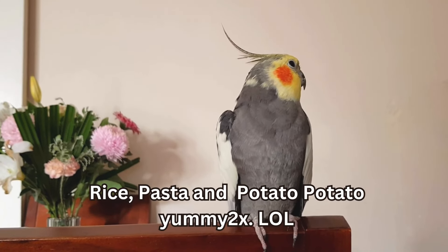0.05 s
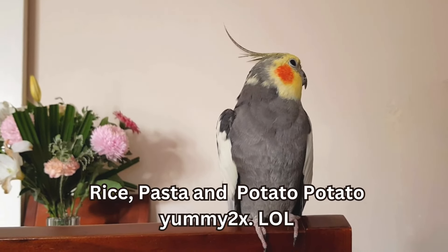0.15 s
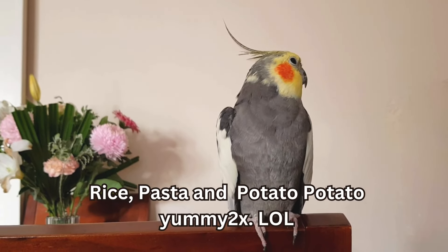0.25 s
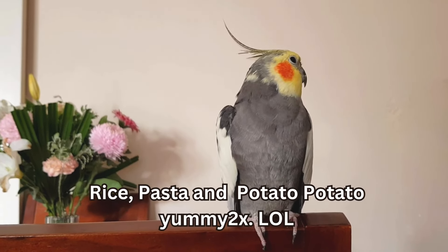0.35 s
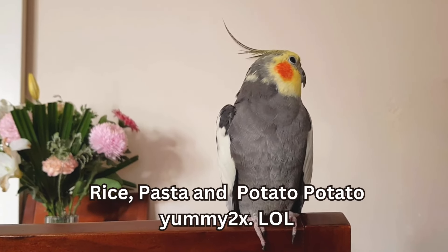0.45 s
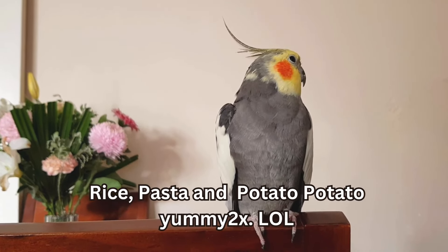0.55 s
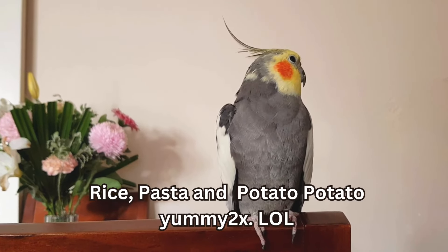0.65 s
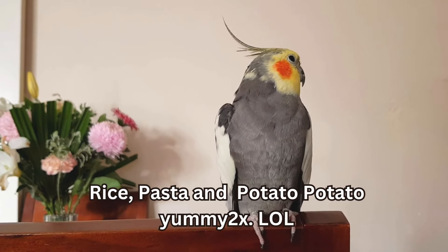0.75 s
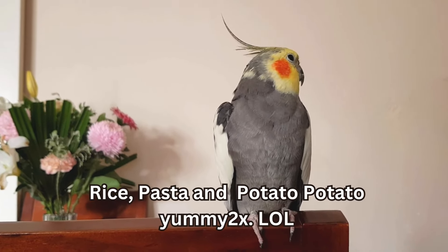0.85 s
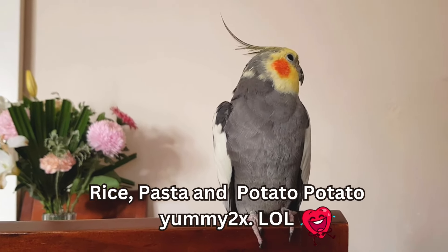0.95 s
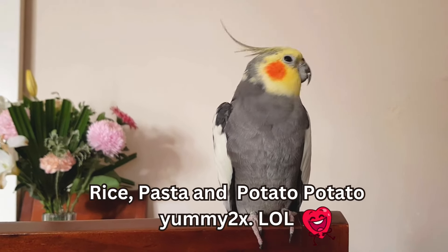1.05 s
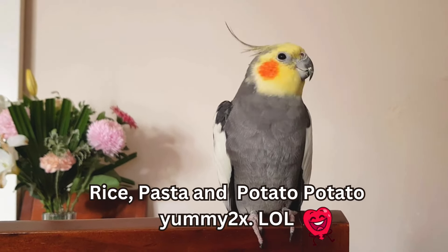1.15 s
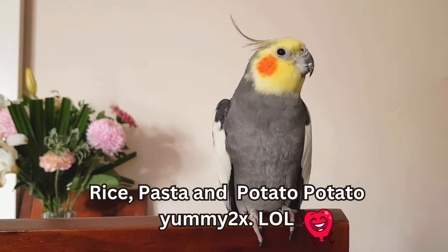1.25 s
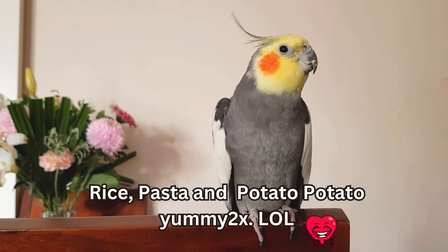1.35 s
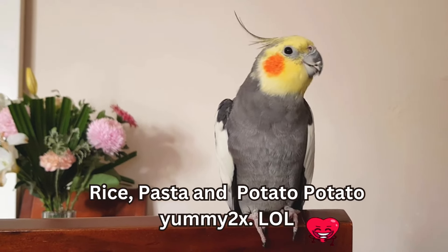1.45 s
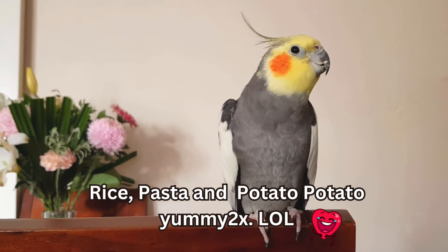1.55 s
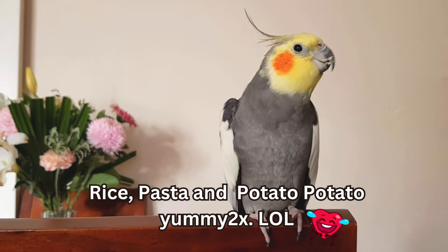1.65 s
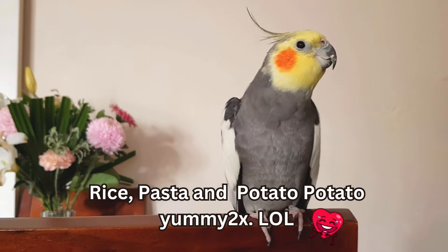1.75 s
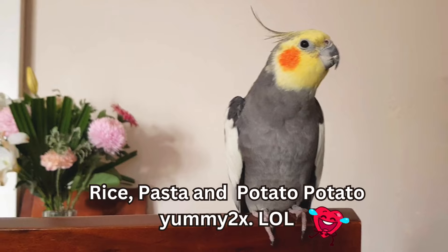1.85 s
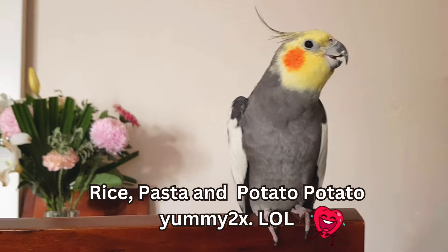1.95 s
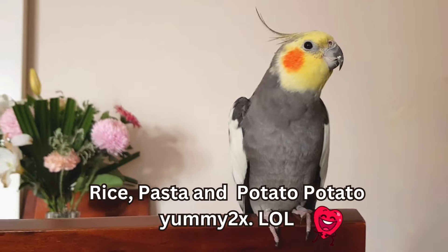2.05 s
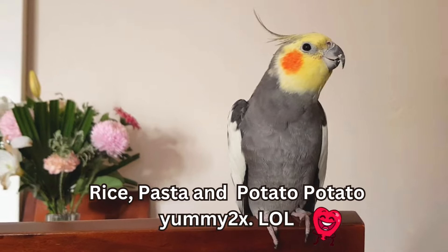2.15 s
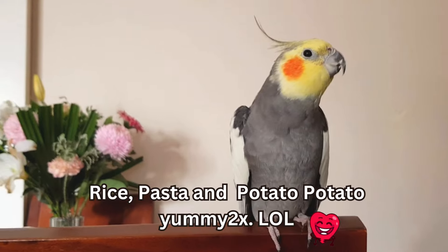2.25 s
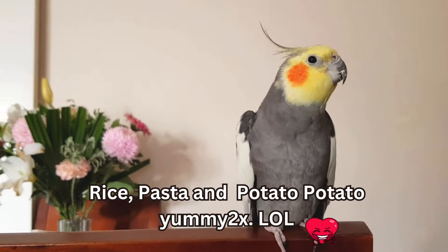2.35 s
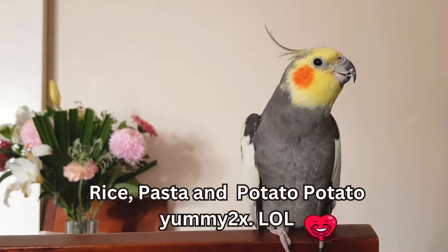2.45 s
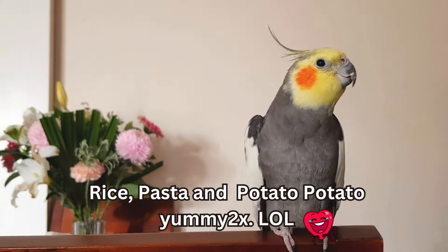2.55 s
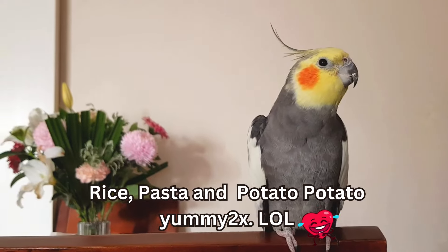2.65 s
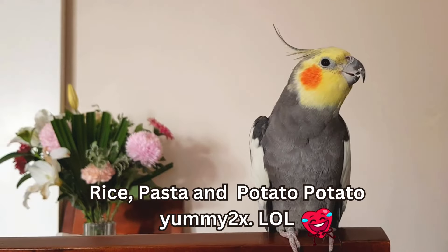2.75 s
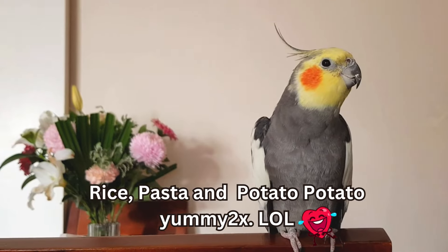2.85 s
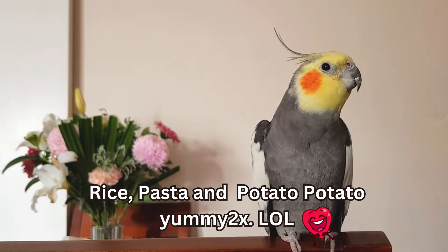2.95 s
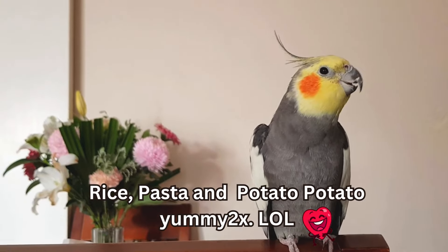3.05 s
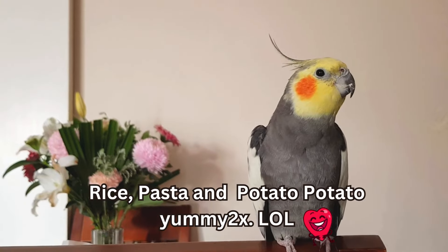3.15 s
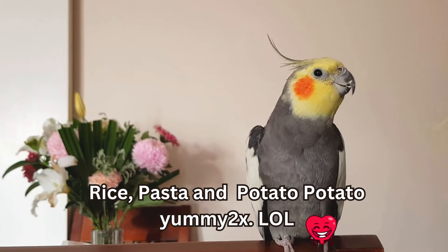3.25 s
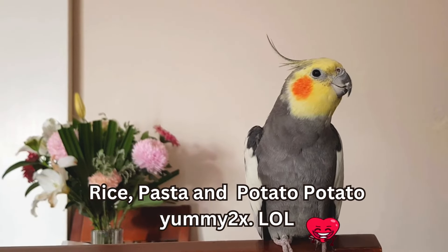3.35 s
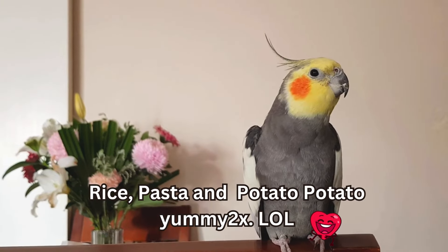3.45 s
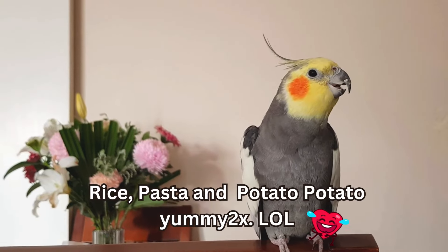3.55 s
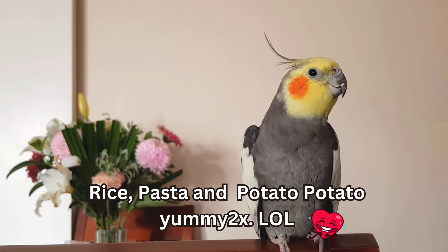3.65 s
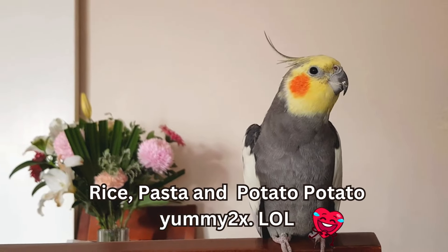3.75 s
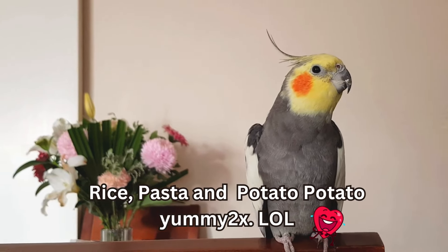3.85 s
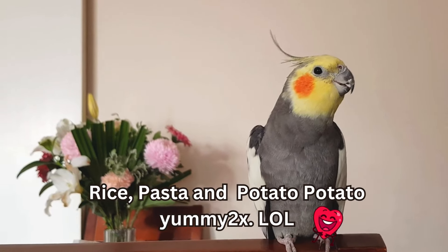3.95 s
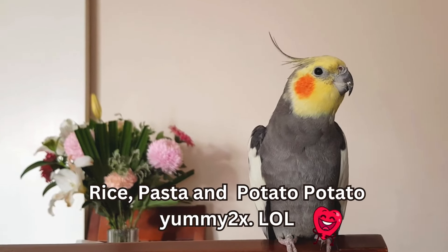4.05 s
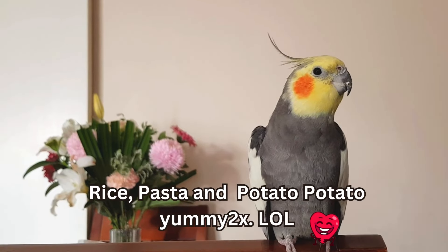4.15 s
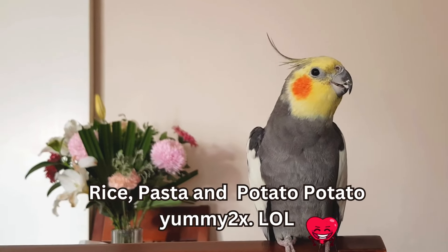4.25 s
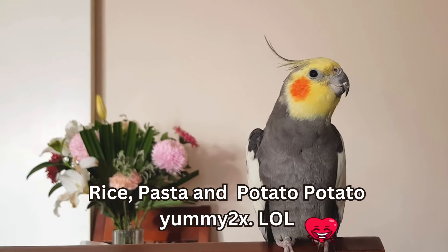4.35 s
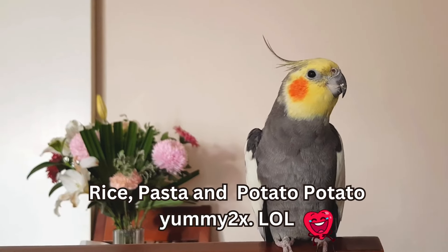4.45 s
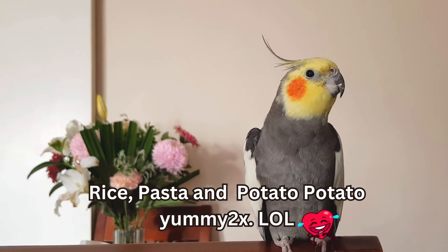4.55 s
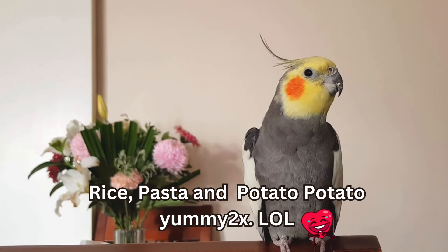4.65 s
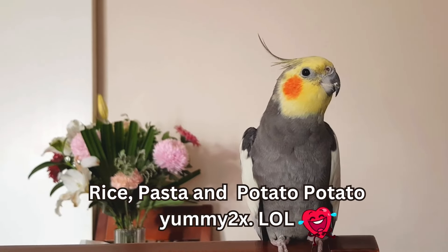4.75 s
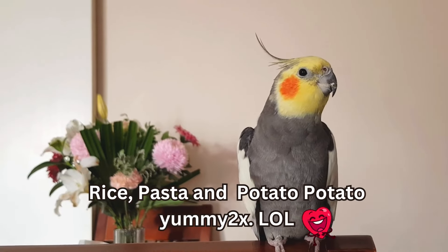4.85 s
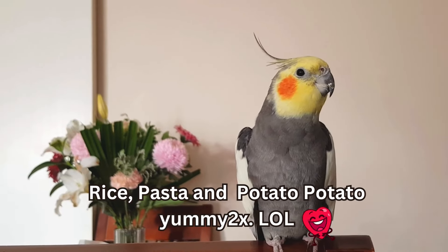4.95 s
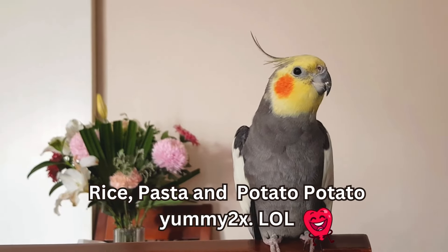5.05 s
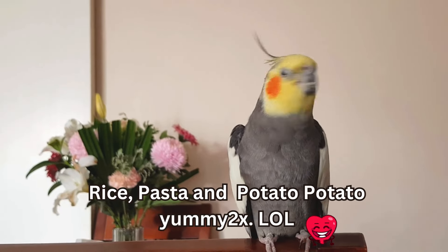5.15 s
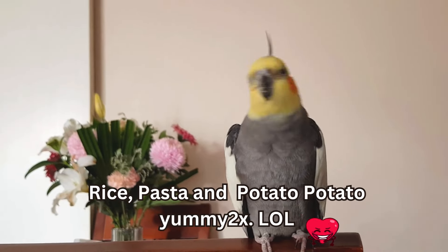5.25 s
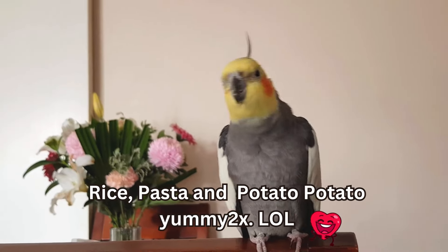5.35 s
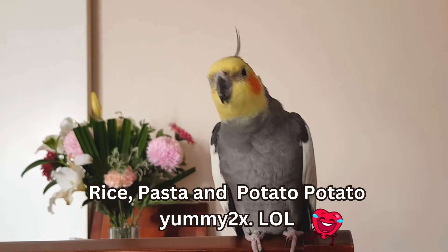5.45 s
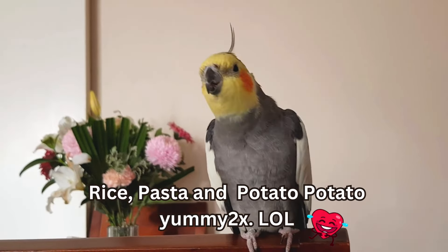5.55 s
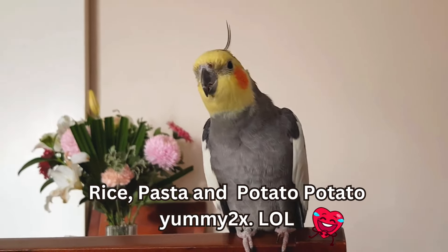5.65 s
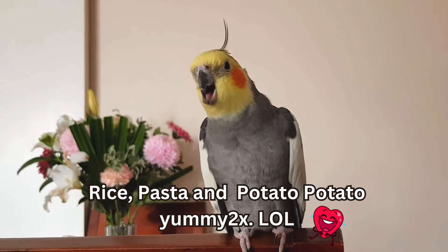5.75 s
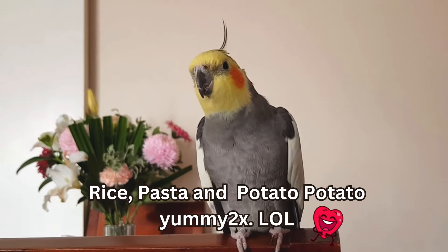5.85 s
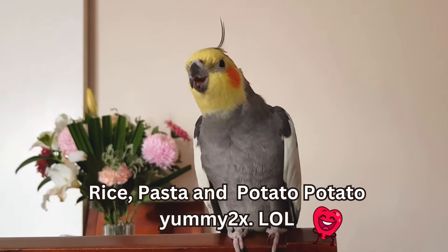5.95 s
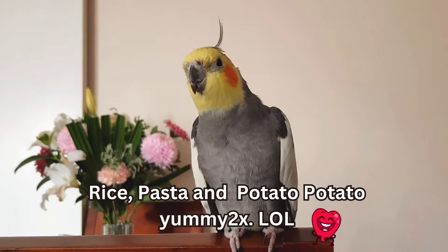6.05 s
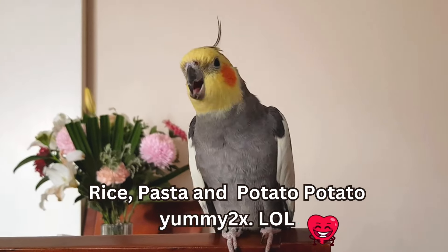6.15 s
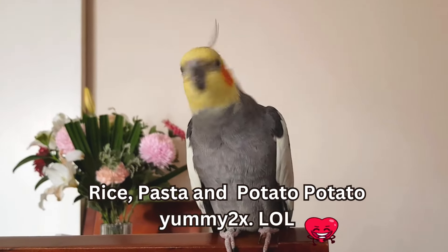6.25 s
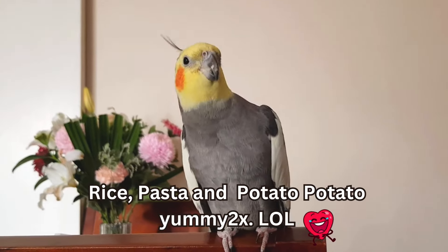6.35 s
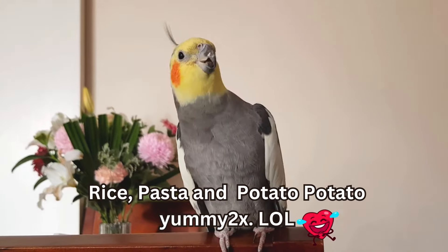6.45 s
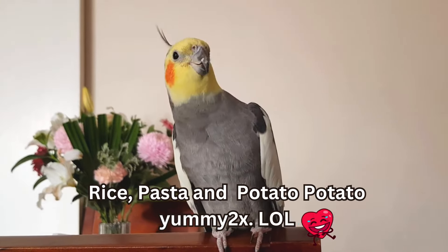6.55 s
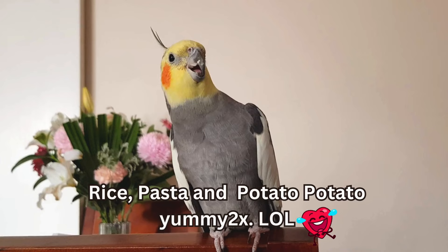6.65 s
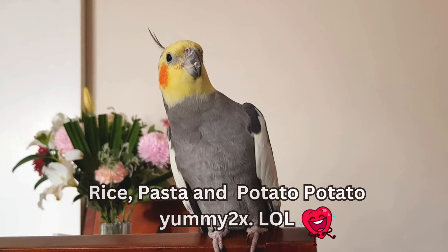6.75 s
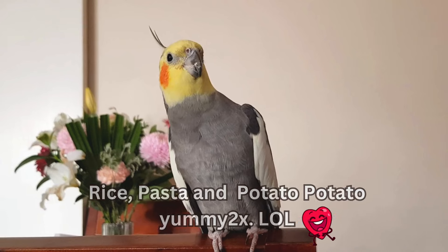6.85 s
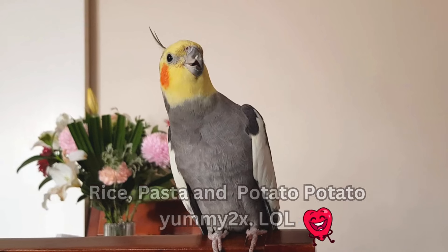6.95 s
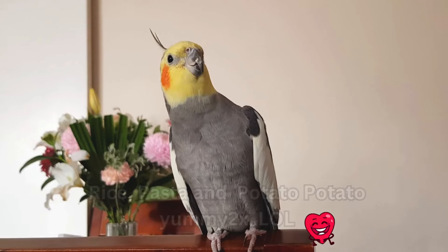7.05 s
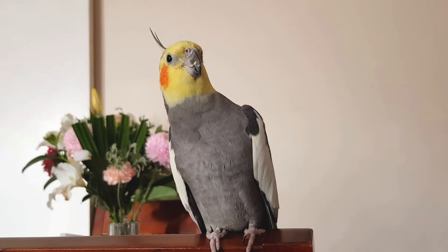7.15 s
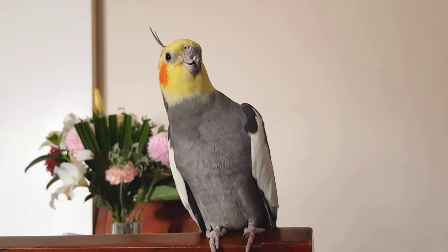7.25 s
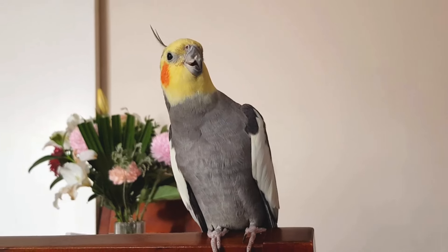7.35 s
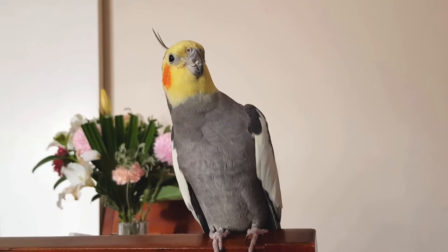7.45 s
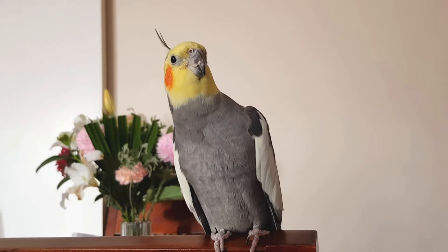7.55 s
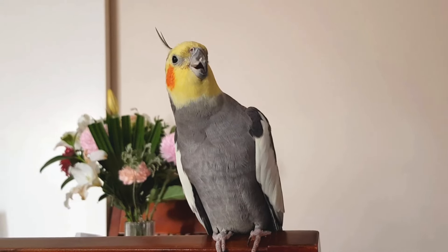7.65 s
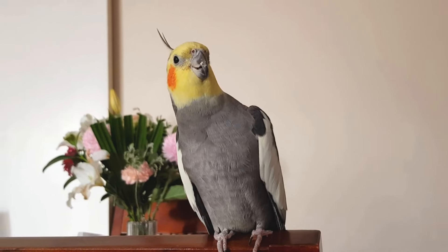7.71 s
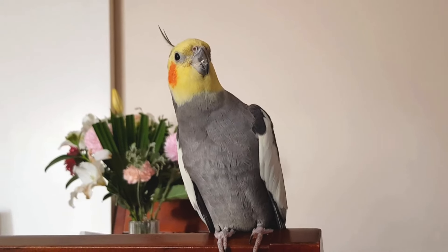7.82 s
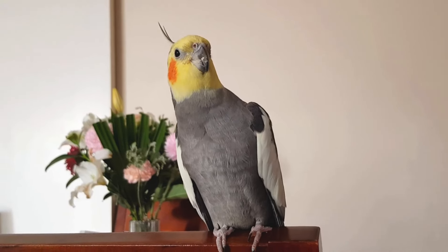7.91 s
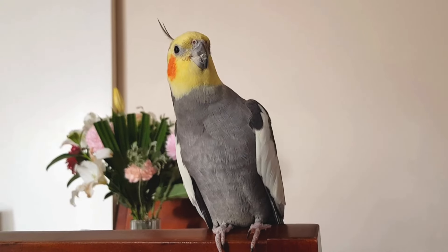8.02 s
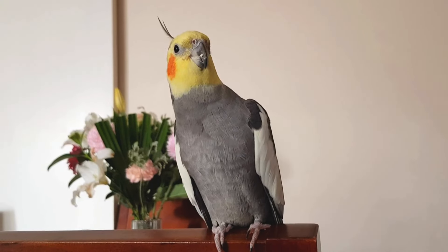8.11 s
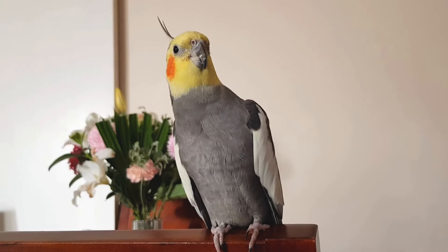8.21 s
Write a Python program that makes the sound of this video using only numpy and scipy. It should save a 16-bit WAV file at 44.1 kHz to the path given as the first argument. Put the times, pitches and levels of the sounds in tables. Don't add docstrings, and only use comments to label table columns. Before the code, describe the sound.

A cockatiel close to the microphone in a quiet, hard-walled room opens with small throaty clucks and a brief harsh screech, then gives loud, clear, short whistles scooping upward at a steady pace. After a pause come softer whistles alternating with three rapid, raspy squawks. Sparrows chirp faintly outside, a vehicle slowly accelerates in the street, and low hum and hiss lie underneath.

```python
import sys
import numpy as np
from scipy import signal
from scipy.fft import rfft, irfft, next_fast_len
from scipy.io import wavfile
from scipy.ndimage import uniform_filter1d

SR = 44100
rng = np.random.default_rng(int(sys.argv[2]) if len(sys.argv) > 2 else 0)


def ratio_of_db(decibels):
    return 10 ** (np.asarray(decibels, float) / 20)


def transcribe(u):
    v = np.clip(np.atleast_2d(u).T, -1, 1)
    q = np.round(v * 32767).astype(np.int16)
    wavfile.write(sys.argv[1], SR, q)


N = 365148


def shaped(x, points):
    size = next_fast_len(x.shape[-1])
    hz, db = np.transpose(points)
    f = np.maximum(np.fft.rfftfreq(size, 1 / SR), 1)
    gain = ratio_of_db(np.interp(np.log(f), np.log(np.maximum(hz, 1)), db))
    return irfft(rfft(x, size) * gain, size)[..., :x.shape[-1]]


def unit(x):
    return x / np.sqrt(np.mean(x ** 2))


def walk(rate, size):
    k = max(int(SR / rate), 1)
    chance = rng.standard_normal(max(size, 8192))
    once = uniform_filter1d(chance, k, mode="wrap")
    return unit(uniform_filter1d(once, k, mode="wrap"))[:size]


def later(x, samples):
    size = next_fast_len(len(x) + 64)
    phase = np.exp(-2j * np.pi * np.fft.rfftfreq(size) * samples)
    return irfft(rfft(x, size) * phase, size)[:len(x)]


def stack(turns, orders):
    return sum(np.sqrt(2) * ratio_of_db(db) * np.sin(2 * np.pi * k * turns + k * k) for k, db in orders)


# f/Hz, density level/dB
HUSH = [(120, -45.5), (200, -19), (692, -3.5), (1090, -1), (1220, -3), (1460, -1.5), (2620, -19),
        (3920, -20), (4370, -25.5), (5750, -23), (8440, -31), (13000, -17.5), (15700, -18)]
# f/Hz, density level/dB
RUMBLE = [(12, -36.5), (20, -8), (92, -1.5), (177, -11), (261, -13), (336, -30.5), (400, -30.5), (520, -57),
          (880, -120)]
HUSH_DB, RUMBLE_DB = -66.5, -71
THUD_S, THUD_HZ, THUD_DB = 0.575, 160, -60
CALM_S, CALM_LENGTH_S, CALM_DB = 7.6, .2, -7.5


def hush():
    t = np.arange(N) / SR
    both, left, right = rng.standard_normal((3, N))
    noise = .75 * np.array([both, later(both, 14.0)]) + .65 * np.array([left, right])
    hiss = unit(shaped(noise, HUSH)) * ratio_of_db(HUSH_DB)
    hum = ratio_of_db(0.5 + 1.4 * walk(6.3, N)) * np.sin(2 * np.pi * 100 * t)
    rumble = (unit(shaped(noise, RUMBLE)) + hum) * ratio_of_db(RUMBLE_DB + 2.1 * walk(2.1, N))
    thud = unit(shaped(both, [(THUD_HZ / 3, -30), (THUD_HZ, 0), (2.0 * THUD_HZ, -24), (900, -60)]))
    thud = thud * ratio_of_db(THUD_DB) * np.exp(-((t - THUD_S) / 0.077) ** 2)
    calm = ratio_of_db(CALM_DB * np.clip((t - CALM_S) / CALM_LENGTH_S + .5, 0, 1))
    return calm * (hiss + rumble + thud) * ratio_of_db(np.array([[-2.4], [2.4]]))


# f/Hz, T60/s
ROOM_T60 = [(500, 0.76), (2500, 0.39), (3800, 0.37), (5000, .46), (10000, 0.39), (15000, 0.35)]
# t/s, left level/dB, right level/dB
ECHOES = [
    (.004, -7.5, -39),
    (.009, -48.5, -8.5),
    (0.018, -16, -10),
]
ROOM_DB, ROOM_ALIKE = -9, 0.13


def room(x):
    t = np.arange(int(.9 * SR)) / SR
    both, left, right = rng.standard_normal((3, len(t)))
    alike = np.clip(ROOM_ALIKE, 0, 1)
    raw = np.sqrt(alike) * both + np.sqrt(1 - alike) * np.array([left, right])
    hz, t60 = np.transpose(ROOM_T60)
    tail = 0
    for k in range(len(hz)):
        band = [(f, 0 if j == k else -40) for j, f in enumerate(hz)]
        tail = tail + shaped(raw, band) * np.exp(-np.log(1000) * t / t60[k])
    tail = tail * np.clip((t - .005) / 0.038, 0, 1)
    tail = ratio_of_db(ROOM_DB) * tail / np.sqrt(np.sum(tail ** 2) / 2)
    for s, left_db, right_db in ECHOES:
        tail[:, int(s * SR)] += ratio_of_db(np.array([left_db, right_db]))
    return signal.fftconvolve(x[None], tail, axes=1)[:, :N]


# t/s, length/s, start f/Hz, end f/Hz, level/dB
SPARROWS = [(0.37, 0.048, 6100, 7260, -70), (0.596, 0.059, 5440, 6920, -64),
            (0.607, 0.078, 3050, 3820, -65.5), (0.683, 0.039, 3150, 3450, -60),
            (0.842, .07, 5450, 7060, -61), (0.873, 0.1, 3200, 4020, -61), (0.978, 0.12, 3160, 3470, -63),
            (1.087, 0.055, 5500, 7040, -61.5), (1.096, 0.11, 3090, 3300, -65),
            (1.2, 0.074, 6200, 6700, -67), (1.212, 0.11, 3160, 3990, -62),
            (3.411, 0.058, 3360, 3560, -64.5), (3.62, 0.16, 4500, 4450, -58), (1.82, .12, 5900, 6500, -66),
            (1.84, .1, 3000, 3700, -64), (2.36, .08, 5500, 6300, -70), (.78, .07, 4300, 4800, -68),
            (.99, .06, 6300, 6900, -69), (3.71, 0.14, 3420, 3500, -66), (4.82, .06, 4100, 4300, -77.5),
            (5.12, 0.12, 3690, 3900, -74), (5.2, 0.13, 2520, 2700, -69.5), (5.25, 0.086, 5300, 5400, -76)]
# f/Hz, level/dB
CHATTER = [(2500, -30), (3300, -2.5), (3900, -7.5), (4600, -4), (5600, -9.5), (6500, -10), (7600, -26.5)]
# start t/s, end t/s, level/dB
BOUTS = [
    (-.5, 1.45, -70),
    (1.5, 4.3, -75),
    (5.3, 7.4, -79),
]
BOUT_EDGE_S = .25


def sparrows():
    chirps = np.zeros(N)
    for s, length, hz0, hz1, db in SPARROWS:
        u = np.linspace(0, 1, int(length * SR))
        hz = (hz0 + (hz1 - hz0) * u ** 0.92) * (1 + 0.011 * walk(220, len(u)))
        sweep = np.sin(2 * np.pi * np.cumsum(hz) / SR)
        chirps[int(s * SR):int(s * SR) + len(u)] += ratio_of_db(db) * np.sin(np.pi * u) * sweep
    t = np.arange(N) / SR
    bouts = sum(ratio_of_db(db) * np.clip(np.minimum(t - s0, s1 - t) / BOUT_EDGE_S + .5, 0, 1) for s0, s1, db in BOUTS)
    level = bouts * ratio_of_db(4.5 * walk(9, N))
    flock = level * unit(shaped(rng.standard_normal((2, N)), CHATTER))
    return (chirps + flock) * np.array([[.6], [1]]) + room(chirps)


def columns(note, edge_s):
    s, *rest = np.transpose(note)
    t = np.arange(s[0], s[-1], 1 / SR)
    gate = np.clip(np.minimum(t - s[0], s[-1] - t) / edge_s, 0, 1)
    smooth = [uniform_filter1d(np.interp(t, s, c), int(0.00067 * SR), mode="nearest") for c in rest]
    return int(s[0] * SR), smooth, gate


def rough_notes(notes, orders, rasp, rasp_db):
    out = np.zeros(N)
    for note in notes:
        i, (hz, db, rough, *shares), gate = columns(note, 0.00033)
        turns = np.cumsum(hz * (1 + .08 * rough * walk(330, len(hz)))) / SR
        uneven = 1 + sum(share * np.sin(2 * np.pi * turns / (k + 2)) for k, share in enumerate(shares))
        size = 1 + np.clip(rough, 0, 1) * np.tanh(walk(400, len(hz)))
        sound = uneven * stack(turns, orders) + rough * ratio_of_db(rasp_db) * rasp[i:i + len(hz)]
        out[i:i + len(hz)] += gate * ratio_of_db(db) * size * sound
    return out


# t/s, f/Hz, level/dB
SCREECHES = [
    [(.003, 3950, -41), (.015, 3350, -41), (.03, 3050, -44)],
    [(1.472, 2300, -47), (1.492, 3100, -35), (1.515, 3280, -42), (1.545, 3790, -37.5), (1.567, 3350, -33.5),
     (1.587, 3000, -42.5), (1.605, 2700, -54)],
]
# multiple, level/dB
SCREECH_ORDERS = [(1, 5), (2, -33), (3, -20.5), (4, -28)]
SCREECH_ROUGH, SCREECH_HALF, SCREECH_THIRD = .45, .8, .25


def screech(curve):
    return [(s, hz, db, SCREECH_ROUGH, np.interp(hz, (2300, 3200), (SCREECH_HALF, .05)), SCREECH_THIRD)
            for s, hz, db in curve]


def screeches(rasp):
    return rough_notes([screech(curve) for curve in SCREECHES], SCREECH_ORDERS, rasp, rasp_db=4)


CRACK_AT, CRACK_WIDTH = .6, .1


def cluck(row, throat):
    s, length, hz0, hz1, db = row
    rough0, rough1, half0, half1, fall_db = throat
    u = np.linspace(0, 1, num=20)
    late = 1 / (1 + np.exp((CRACK_AT - u) / CRACK_WIDTH))
    hz = hz0 + (hz1 - hz0) * np.sin(np.pi * u / 2) ** 2
    rough = rough0 + (rough1 - rough0) * late
    half = half0 + (half1 - half0) * late
    return np.transpose([s + length * u, hz, db - fall_db * u ** 2, rough, half])


# t/s, length/s, start f/Hz, end f/Hz, level/dB
CRACKED = [(.3, .045, 1400, 1850, -42), (1.315, .063, 1350, 1330, -41.5)]
PLAIN_CLUCKS = [(.122, .03, 1440, 1350, -42)]
DOUBLED = [(.24, .03, 1420, 1290, -42)]
HOARSE = [(1.258, .01, 1420, 1310, -58), (5.335, .03, 2000, 1400, -61.5)]
# roughness 0-1 at start, at end, half-pitch share 0-1 at start, at end, final fall/dB
CRACK = (.05, .8, .04, .9, 7)
PLAIN = (.3, .3, .04, .04, -4)
DOUBLE = (.05, .05, .35, .35, 5)
HUSK = (.4, .4, .05, .05, 5)
# multiple, level/dB
CLUCK_ORDERS = [(1, 6), (2, -5.5), (3, -33), (4, -51.5)]


def clucks(rasp):
    throats = [(CRACKED, CRACK), (PLAIN_CLUCKS, PLAIN), (DOUBLED, DOUBLE), (HOARSE, HUSK)]
    notes = [cluck(row, throat) for rows, throat in throats for row in rows]
    return rough_notes(notes, CLUCK_ORDERS, rasp, rasp_db=-6)


ATTACK_S, ATTACK_DB, RELEASE_S = .005, 11, .017
BREATH_DB, BREATH_FADE_DB, BREATH_FOLLOWS = -22, 17, .4


def whistle(row, kind):
    s, length, hz0, hz1, db = row
    wait, rise, creep_hz, sag_hz, swell_wait, swell, swell_db, release_db, over_db = kind
    t = np.linspace(0, length, num=30)
    hz = hz1 - (hz1 - hz0) * np.exp(-np.maximum(t - wait, 0) / rise)
    hz = hz + creep_hz * t - sag_hz * (t / length) ** 4
    level_db = db - swell_db * np.exp(-np.maximum(t - swell_wait, 0) / swell)
    level_db = level_db - ATTACK_DB * np.exp(-t / ATTACK_S)
    level_db = level_db - release_db * np.clip(1 - (length - t) / RELEASE_S, 0, 1)
    air_db = db + BREATH_DB + BREATH_FOLLOWS * (level_db - db) - BREATH_FADE_DB * t / length
    return np.transpose([s + t, hz, level_db, over_db + 0 * t, air_db])


# t/s, length/s, start f/Hz, top f/Hz, level/dB
SCOOPS = [(1.664, .081, 1970, 2735, -14), (1.915, .09, 2120, 2785, -13.5), (2.716, .074, 2110, 2580, -16),
          (3.881, .085, 2020, 2845, -13.5)]
FLICKS = [(2.997, .083, 2100, 2780, -14), (3.268, .08, 2080, 2770, -12.5), (3.53, .087, 2110, 2805, -12.5),
          (6.39, .078, 2300, 2765, -21.5), (6.93, .084, 2400, 2765, -22)]
SLIDES = [(2.165, .097, 2010, 2370, -12.5), (2.451, .097, 1970, 2345, -12)]
ARCHES = [(5.53, .072, 2310, 2635, -25.5), (5.929, .077, 2200, 2870, -23.5)]
CLIMBS = [(4.247, .079, 2330, 2730, -12), (7.266, .094, 2440, 2715, -21.5), (7.583, .089, 2290, 2740, -20)]
# wait/s, pitch rise/s, creep/(Hz/s), final sag/Hz, swell wait/s, swell/s, swell/dB,
# release/dB, overtone level/dB
SCOOP = (.016, .013, 300, 10, .014, .015, 21, 10, -32)
FLICK = (.012, .013, 500, 10, .014, .015, 23, 10, -33)
SLIDE = (.03, .012, 1500, 60, .006, .045, 28, 6, -30)
ARCH = (.005, .014, 100, 320, .004, .013, 14, 3, -25)
CLIMB = (.002, .016, 3300, 10, .002, .02, 28, 9, -29)
# multiple, level/dB
WHISTLE_ORDERS = [(1, 1), (2, -2.5), (3, -4), (4, 3.5), (5, 9), (6, 3), (7, -7)]
# t/s, half length/s, rate/Hz, depth as a share of f
WARBLES = [
    (2.479, .015, 92, -.05),
    (7.341, .012, 22, .065),
]


def whistles(air, pop_db=-21, pop_s=0.0058, waver=0.0045, grain_db=3.2, bloom=0.2):
    out = np.zeros(N)
    kinds = [(SCOOPS, SCOOP), (FLICKS, FLICK), (SLIDES, SLIDE), (ARCHES, ARCH), (CLIMBS, CLIMB)]
    for note in [whistle(row, kind) for rows, kind in kinds for row in rows]:
        i, (hz, db, over_db, air_db), gate = columns(note, .006)
        n = len(hz)
        t = np.arange(n) / SR
        shake = 0
        for s, half, rate_hz, depth in WARBLES:
            since = t + i / SR - s
            shake = shake + depth * np.exp(-(since / half) ** 4) * np.cos(2 * np.pi * rate_hz * since)
        glide = uniform_filter1d(hz, SR // 100, mode="nearest")
        turns = np.cumsum(glide * (1 + shake + waver * walk(170, n))) / SR
        over = sum(ratio_of_db(grain_db * walk(600, n)) * stack(turns, [order]) for order in WHISTLE_ORDERS[1:])
        over = ratio_of_db(over_db + bloom * (db - db.max())) * over
        tone = ratio_of_db(db) * (stack(turns, WHISTLE_ORDERS[:1]) + over)
        hiss = ratio_of_db(air_db) * np.clip(t / 0.012, 0, 1) * air[i:i + n]
        out[i:i + n] += gate * (tone + hiss)
        pop = np.exp(-t / pop_s) * np.sin(2 * np.pi * 1700 * t + 1.5 * walk(790, n))
        softer_db = 0.03 * max(hz.max() - 2600, 0)
        out[i + n:i + 2 * n] += ratio_of_db(db.max() + pop_db - softer_db) * pop
    return out


YELP_THIRD, YELP_SAG, YELP_FALL_DB = .07, .17, 9


def yelp(s, length, hz, db, half):
    start = (s, .96 * hz, db - 1, .1, .05, .05)
    crest = (s + .4 * length, hz, db, .12, half, YELP_THIRD)
    sag = (s + .7 * length, (1 - .67 * YELP_SAG) * hz, db, .2, half, YELP_THIRD)
    end = (s + length, (1 - YELP_SAG) * hz, db - YELP_FALL_DB, .4, half, YELP_THIRD)
    return [start, crest, sag, end]


# t/s, length/s, f/Hz, level/dB, half-pitch share 0-1
YELPS = [(5.723, .004, 1900, -33.5, .3), (5.738, .013, 2237, -25, .02), (5.758, .014, 2205, -22, .06),
         (5.773, .022, 2244, -22, .3), (6.115, .014, 1950, -33.5, .05), (6.132, .012, 2190, -28, .05),
         (6.148, .014, 2257, -26, .05), (6.167, .024, 2267, -27, .66), (6.603, .013, 1995, -34, .16),
         (6.622, .012, 2230, -27, .02), (6.642, .022, 2250, -27.5, .18)]
# multiple, level/dB
SQUAWK_ORDERS = [(1, -6), (2, .5), (3, -27), (4, -36), (5, -24), (6, -26.5), (7, -24.5)]


def squawks(rasp):
    return rough_notes([yelp(*row) for row in YELPS], SQUAWK_ORDERS, rasp, rasp_db=.1)


# f/Hz, level/dB
AIR = [(500, -27.5), (1500, -8.5), (2500, -6), (3600, -20), (4800, -17.5), (7000, -29), (9000, -29.5),
       (11500, -6), (14000, -7), (16000, -7.5)]
# f/Hz, level/dB
RASP = [(500, -21), (1200, -5), (2200, -7), (3000, -2.5), (4500, -3), (5500, -24), (7000, -19.5),
        (9000, -17.5), (11500, -7), (14000, -14), (16000, -21.5)]
# f/Hz, gain/dB
BEAK = [(250, -37.5), (450, -6), (900, -3), (5000, 0), (6300, 0.5), (7800, -1.5), (10000, -7), (13000, 0.5),
        (16000, -2.5)]
# f/Hz, gain/dB
TURN_COLOUR = [(1500, 5), (3000, 8.5), (4500, 6), (6200, 10), (8000, 4), (13000, 3)]
TURN_S, TURN_LAG, TOP_LAG = 5.2, 6.07, 28.8


def cockatiel():
    air = unit(shaped(rng.standard_normal(N), AIR))
    rasp = unit(shaped(rng.standard_normal(N), RASP))
    voice = screeches(rasp) + clucks(rasp) + whistles(air) + squawks(rasp)
    turned = np.arange(N) / SR > TURN_S
    voice = shaped(voice * ~turned + shaped(voice * turned, TURN_COLOUR), BEAK)
    low = shaped(voice * turned, [(6800, 0), (7800, -50)])
    top = shaped(voice * turned, [(13200, -50), (13900, 0)])
    right = voice - low - top + later(low, TURN_LAG) + later(top, TOP_LAG)
    return ratio_of_db(-0.19) * np.array([voice, ratio_of_db(-1.54) * right]) + ratio_of_db(1.3) * room(voice)


# multiple of the cycle rate, level/dB
ENGINE_ORDERS = [(4, -12), (5, 0), (6, -1), (7, 1), (8, 0), (9, -9), (10, 1), (11, -7), (12, -7), (13, -1),
                 (14, -6), (15, 0), (17, -6), (18, -4), (20, -2), (23, -3), (25, -1), (28, -5), (30, -5)]
# t/s, f/Hz
VEHICLE_HZ = [(1.7, 17.5), (3.0, 19.25), (4.0, 20.85), (4.6, 22.1), (7.0, 27.75), (7.25, 28.1), (7.6, 28.2)]
# t/s, level/dB
VEHICLE_DB = [(1.7, -79), (2.5, -62), (3.77, -58), (5.59, -60.5), (7.09, -54), (7.39, -60.5), (7.6, -80)]
# f/Hz, gain/dB
PANE = [(40, -40), (85, -15), (135, 0), (190, -1), (235, -14), (290, -12), (400, -21), (650, -14),
        (1000, -21), (1600, -38)]


def vehicle():
    t = np.arange(N) / SR
    cycle_hz = np.interp(t, *np.transpose(VEHICLE_HZ))
    turns = np.cumsum(cycle_hz * (1 + .0015 * walk(4, N))) / SR
    engine = 0
    for order in ENGINE_ORDERS:
        drift = ratio_of_db(3 * walk(1.5 * 64, N // 64 + 1))
        engine = engine + np.repeat(drift, 64)[:N] * stack(turns, [order])
    road = unit(shaped(rng.standard_normal(N), PANE))
    sound = unit(shaped(engine, PANE)) + ratio_of_db(-12) * road
    sound = sound * ratio_of_db(np.interp(t, *np.transpose(VEHICLE_DB), left=-99, right=-99))
    return np.array([ratio_of_db(-3) * sound, ratio_of_db(1.2) * later(sound, 14.0)])


def scene():
    return hush() + sparrows() + cockatiel() + vehicle()


def band_limit(x):
    return signal.sosfilt(signal.butter(12, 16610, fs=SR, output="sos"), x)


# f/Hz, gain/dB
RIGHT_PORT = [(6000, 1.5), (9000, -0.4), (12000, 2.5), (16000, 4)]


def record(dry):
    ports = np.array([dry[0], shaped(dry[1], RIGHT_PORT)])
    top = signal.ellip(8, .2, 60, 15750, fs=SR, output="sos")
    return band_limit(signal.sosfilt(top, ports))


dry = scene()
out = record(dry)
transcribe(out)
```